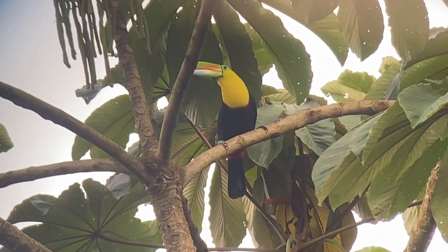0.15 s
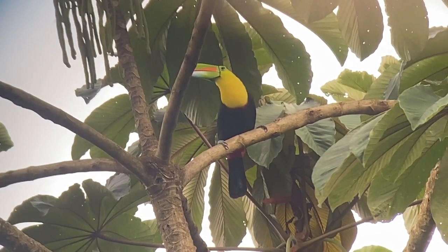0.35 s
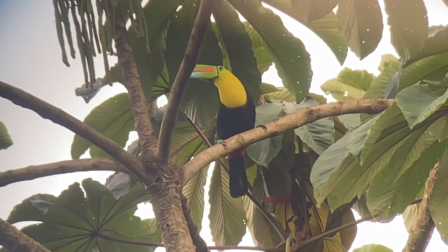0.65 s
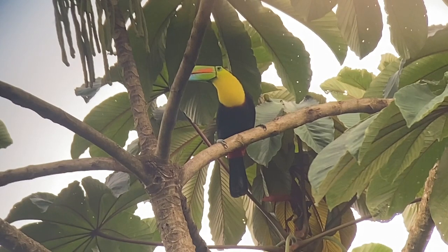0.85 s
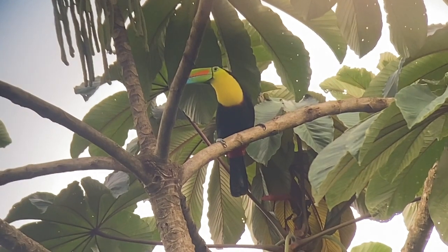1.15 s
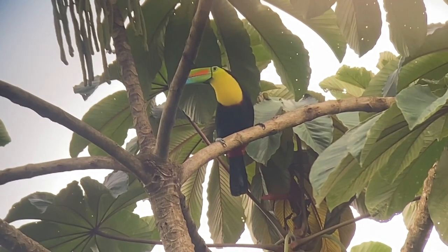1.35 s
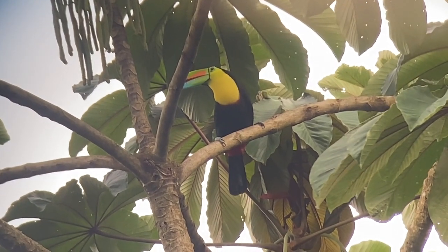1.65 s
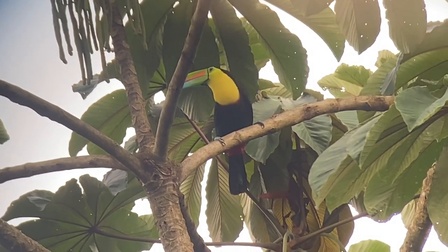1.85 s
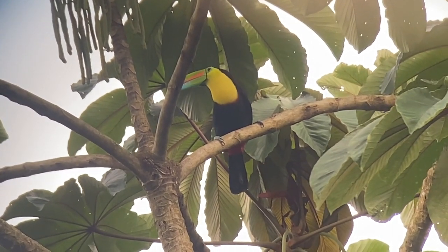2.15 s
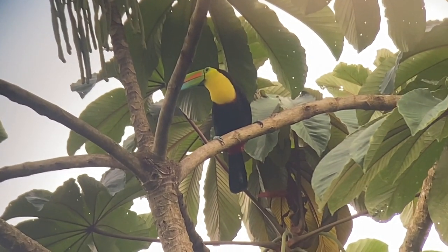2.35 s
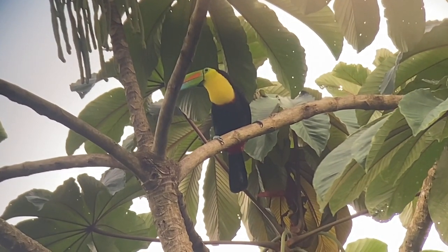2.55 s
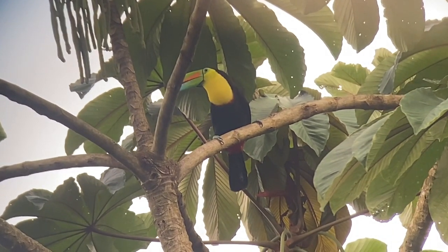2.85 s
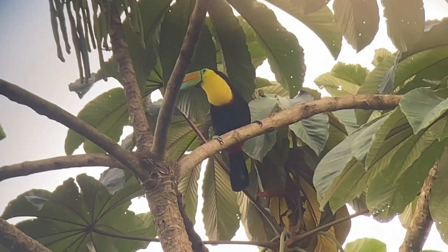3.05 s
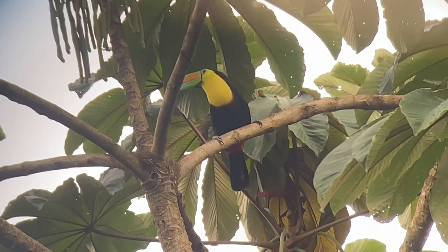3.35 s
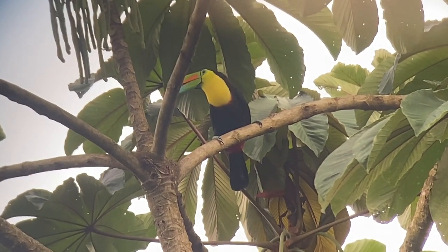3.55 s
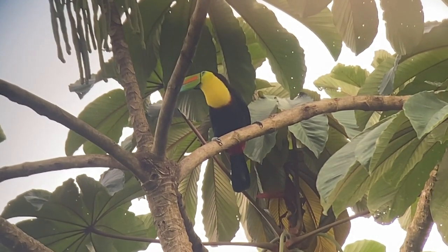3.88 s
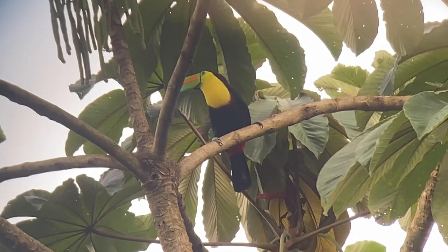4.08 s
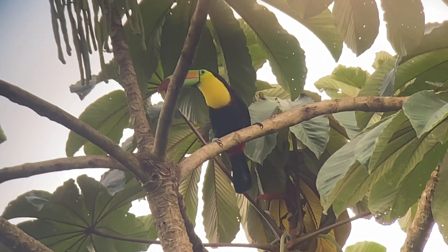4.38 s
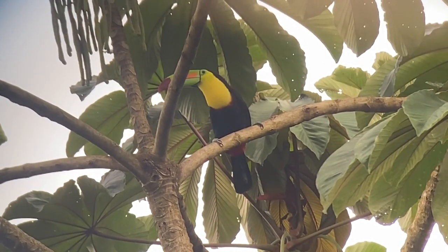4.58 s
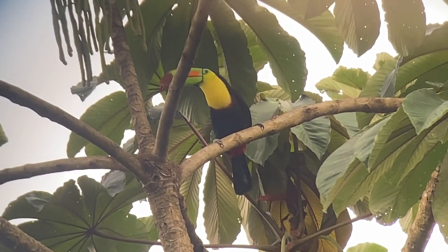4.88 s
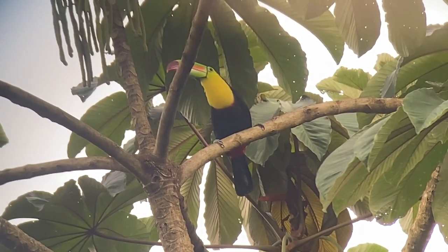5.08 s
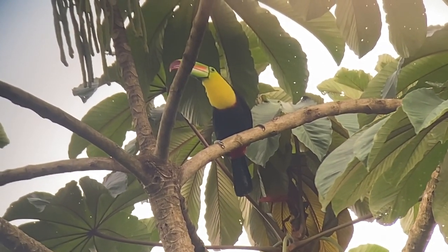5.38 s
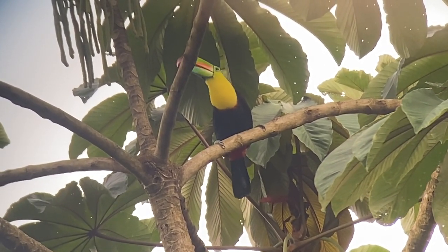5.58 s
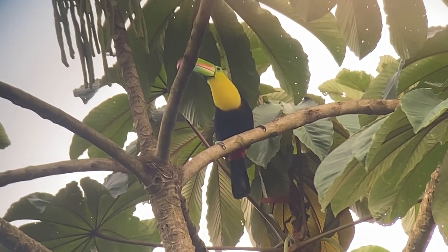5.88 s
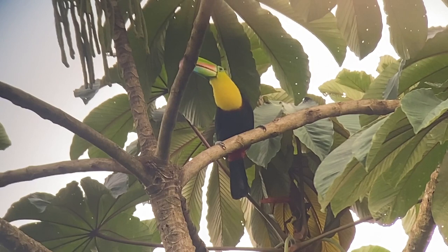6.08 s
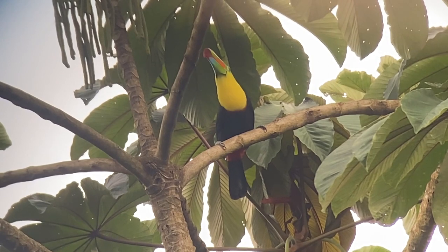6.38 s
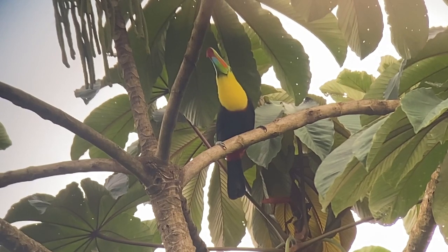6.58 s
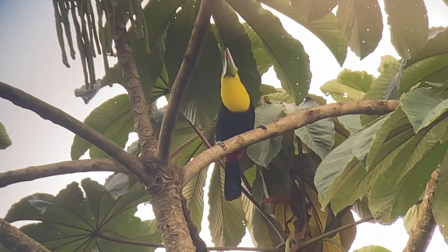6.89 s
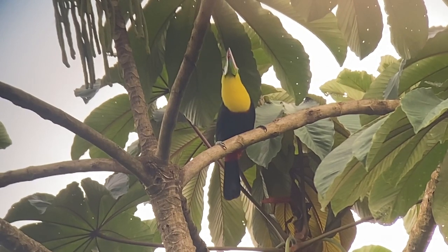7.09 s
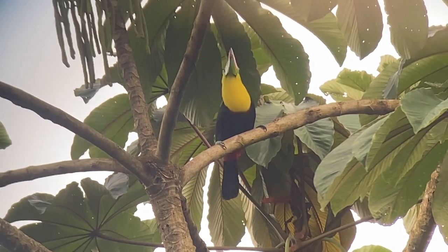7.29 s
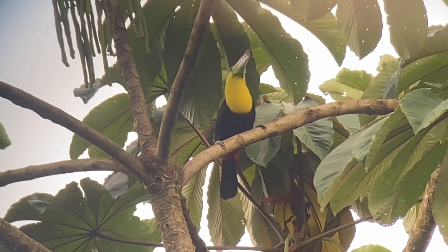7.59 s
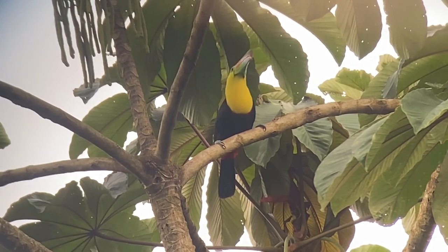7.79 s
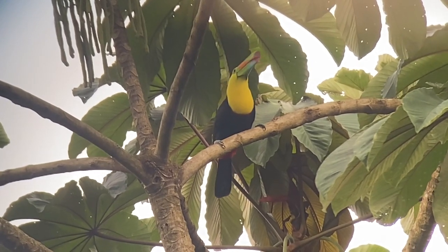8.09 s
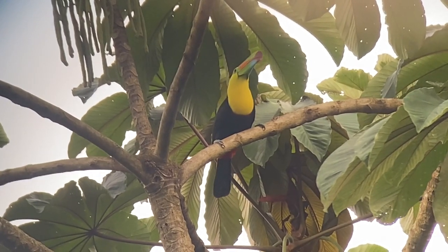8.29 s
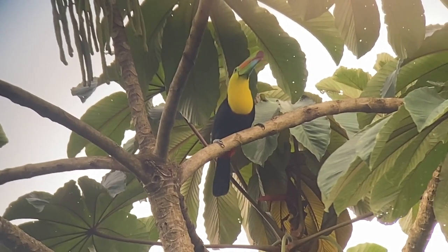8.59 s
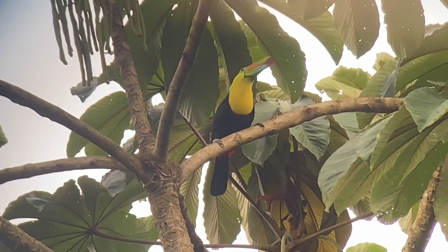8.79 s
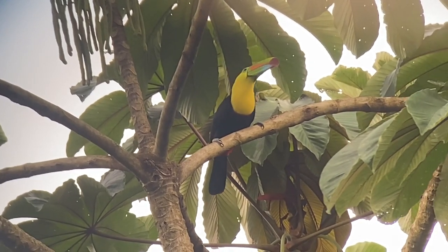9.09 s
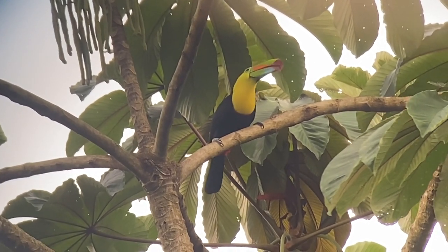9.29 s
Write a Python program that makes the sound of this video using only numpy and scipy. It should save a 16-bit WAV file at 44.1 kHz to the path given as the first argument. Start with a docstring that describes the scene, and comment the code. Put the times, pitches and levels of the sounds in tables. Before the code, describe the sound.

Two toucans trade short, dry croaks through the trees while insects hiss and light wind bumps the microphone.

```python
"""Two toucans in the forest

A toucan croaks in a tree a dozen metres away and a second answers from deeper in the forest. Each croak
is a rattle of short syrinx pulses that speeds up and rises, echoed by the leaves. Insect choirs hiss and
throb, a small caller chirps up high, and light wind thumps on the microphone. A low rustle, a wisp of
hiss and one thin bird whistle pass by."""
import sys
import numpy as np
from scipy import signal
from scipy.fft import rfft, irfft, next_fast_len
from scipy.io import wavfile
from scipy.ndimage import uniform_filter1d

SR = 44100
rng = np.random.default_rng(int(sys.argv[2]) if len(sys.argv) > 2 else 0)


def pcm_store(signal):
    """Save signal as 16-bit PCM."""
    levels = np.round(np.clip(np.atleast_2d(signal), -1, 1) * 32767)
    wavfile.write(sys.argv[1], SR, levels.astype(np.int16).T)


N = 416304

# Tone of the forest bed, centre and sides. Each row: frequency in Hz, relative level in dB.
BED_MID_SPECTRUM = [(100, -10), (160, -7.5), (350, -9.5), (1100, -16.5), (1700, -9), (2450, 3.5),
                    (3200, -13.5), (3700, -19.5), (5100, -26), (6050, -18), (6800, -17), (7500, -32),
                    (8400, -40), (12000, -60.5)]
BED_SIDE_SPECTRUM = [(24, -42.5), (60, -16), (180, -24.5), (560, -20), (1250, -18), (2000, -26),
                     (3200, -17), (7600, -50.5), (8500, -23), (9100, -27), (9650, -40), (10100, -68.5),
                     (14000, -100)]
# The ride of the wind rumble. Each row: time in seconds, level in dB.
RUMBLE_LEVELS = [(0.0, -73), (0.52, -68), (1.02, -57.5), (1.52, -61), (1.79, -53), (2.5, -52),
                 (2.92, -57.5), (4.05, -61), (4.6, -54), (4.81, -57), (6.1, -58.5), (6.73, -47.5),
                 (6.94, -54.5), (7.57, -52.5), (8.15, -58), (8.7, -54.5), (8.99, -49.5), (9.44, -60)]
# Eddies hitting the microphone. Each row: time in seconds, peak in dB, pitch in Hz, length in ms.
WIND_THUMPS = [(1.982, -37.5, 67.6, 19), (2.438, -32.5, 93, 32), (2.484, -29, 80.5, 33),
               (2.47, -38, 150, 50), (2.557, -39.5, 82, 10), (4.489, -49, 237, 33), (4.488, -37, 145, 14),
               (5.085, -40, 64, 26), (5.346, -45.5, 183, 43.5), (6.303, -31, 76, 10.5),
               (6.357, -36.5, 53.7, 31), (6.552, -27.5, 83, 7.8), (6.621, -27.5, 80, 20),
               (6.769, -29.5, 66, 9.5), (6.839, -29, 62, 41), (7.219, -39.5, 61.6, 88),
               (7.284, -48, 260, 15), (7.711, -25, 60, 23), (8.42, -47.5, 198, 15), (8.614, -37, 71.6, 41),
               (8.932, -47, 189, 21), (9.216, -38.5, 64.7, 18)]
# The small caller. Each row: time in seconds, relative level in dB, pitch in Hz.
HIGH_CHIRPS = [(.012, -66, 9000), (.32, -65, 9100), (.65, -66, 9000), (.99, -69, 8850), (1.31, -66, 9000),
               (1.625, -61, 9100), (1.96, -62, 9030), (2.29, -64, 8970), (2.63, -62, 8920),
               (3.201, -66, 9180), (3.54, -61, 8950), (3.87, -66, 8970), (4.21, -69, 9000),
               (4.54, -66, 9000), (4.905, -62, 8930), (5.24, -64, 8950), (5.58, -65, 8850),
               (5.91, -60, 9030), (6.72, -64, 9150), (7.23, -61, 9300), (7.57, -59, 8950),
               (7.89, -62, 9000), (8.23, -61, 9000), (8.58, -59, 9000), (8.93, -63, 9000),
               (9.31, -65, 9100)]
# The near toucan. Each row: times in seconds of the first pulse, the restart after a stumble, the switch
# to double speed, the peak and the last pulse; relative opening and peak levels in dB; slow-rattle pitch
# in Hz; base offsets in dB of the 2nd harmonic, the 3rd harmonic and every other fast pulse.
NEAR_CROAKS = [(.3221, .3221, .342, 0.38, .4065, -39, -33.5, 1800, -22, -18.5, -1),
               (.962, .962, 1.0443, 1.044, 1.0765, -39, -35, 1780, -17.5, -22, -6),
               (1.6233, 1.6628, 1.7471, 1.7, 1.7471, -39, -34, 1770, -16, -20, -2),
               (2.2898, 2.3187, 2.38, 2.37, 2.4137, -40, -35, 1800, -17.5, -23, -2.5),
               (2.9488, 2.9488, 3.0093, 3.02, 3.0747, -41.5, -35, 1770, -19, -24, 2),
               (3.6035, 3.6725, 3.6921, 3.695, 3.7255, -42, -33.5, 1800, -19, -27, -4),
               (4.2354, 4.2856, 4.3472, 4.34, 4.3677, -42, -33.5, 1789, -16.5, -24, -4),
               (4.9396, 4.9396, 5.0393, 5.03, 5.068, -39.5, -35.5, 1840, -16, -19, -3),
               (5.5653, 5.5943, 5.653, 5.66, 5.688, -42, -34, 1810, -18.5, -14.5, -2.5),
               (6.1938, 6.1938, 6.2743, 6.288, 6.3076, -41.5, -33.5, 1740, -19, -13, -6),
               (6.7958, 6.7958, 6.8754, 6.896, 6.93, -38.5, -31.5, 1770, -21, -17, -0.5),
               (7.4255, 7.4255, 7.485, 7.5052, 7.5375, -41, -32, 1780, -26, -16.5, -2),
               (8.038, 8.038, 8.138, 8.14, 8.1715, -39.5, -32, 1750, -24, -15.5, -3.5),
               (8.7234, 8.7623, 8.8243, 8.81, 8.856, -41.5, -31, 1730, -24.5, -14, -4),
               (9.3515, 9.3515, 9.4331, 9.435, 9.4331, -40, -31, 1730, -25.5, -16, -1)]
# Its head turn. Each row: time in seconds, how far it faces the microphone from 0 to 1.
HEAD_TURN = [(0, 0.42), (5.2, 0.6), (6.9, 0.82), (7.4, 0.9), (8.0, 0.87), (9.44, 0.84)]
# Beak resonances holding the 2nd and 3rd harmonics. Each row: pitch at rest in Hz, pitch wide open in Hz,
# delay in seconds, upward slide as a share of the pitch per second.
BEAK_RESONANCES = [(3820, 4080, .0012, 15), (6030, 6150, .0014, 15)]
# Slaps off the nearest leaves and boughs. Each row: delay in ms, relative level in dB, left bias in dB.
BOUGH_ECHOES = [(4.6, -10, 4), (9, -16, -4), (12.5, -20, 4)]
# The far toucan. Each row: times in seconds of the first pulse, the switch to double speed, the peak and
# the last pulse; relative opening and peak levels in dB; pitch at the peak in Hz.
FAR_CROAKS = [(.442, 0.468, .5102, .5195, -51, -40.5, 1623), (1.098, 1.1767, 1.159, 1.1767, -54, -39, 1620),
              (1.773, 1.813, 1.8136, 1.8234, -43.5, -40, 1638),
              (2.4456, 2.497, 2.506, 2.5155, -47.5, -40.5, 1605),
              (3.153, 3.215, 3.216, 3.216, -50, -35.5, 1623), (3.84, 3.9003, 3.912, 3.9255, -49, -42, 1780),
              (4.604, 4.646, 4.656, 4.667, -48, -37.5, 1630),
              (5.2974, 5.36, 5.3593, 5.3593, -47, -34.5, 1630),
              (5.954, 6.057, 6.02, 6.0576, -51.5, -39.5, 1626),
              (6.6978, 6.756, 6.7588, 6.768, -49, -40, 1640)]
# Dry ticks, most on a far croak's peak. Each row: time in seconds, relative peak in dB, pitch in Hz.
DRY_TICKS = [(0.521, -38, 2680), (1.175, -29, 2580), (1.8204, -39, 2340), (2.5126, -32, 2430),
             (3.22, -29.5, 2500), (3.917, -33, 2420), (4.67, -37, 2280), (5.364, -32, 2530),
             (6.053, -31, 2464), (6.766, -31, 2424)]
# One soft rustle: peak time, rise and fall in seconds, centre and width in Hz, level in dB.
LOW_RUSTLE = (4.48, .05, .08, 370, 400, -56)
# One wisp of hiss: peak time and fade each way in seconds, centre and width in Hz, level in dB.
HIGH_HISS = (6.13, .04, 9200, 3200, -77)
# A small bird's whistle. Each row: time in seconds, pitch in Hz, level in dB.
WHISTLE_PATH = [(8.768, 7200, -80), (8.776, 7050, -66), (8.788, 7000, -66), (8.8, 7450, -66),
                (8.812, 8000, -67), (8.818, 8200, -88)]

SLOW_GAP_S, FAST_GAP_S, THROAT_LAG_S = .0203, .0108, .001  # pulse timing of both toucans
SCATTER_S, SCATTER_DB, SCATTER_HZ = .0004, 1, 40  # looseness from pulse to pulse
SIDE = np.array([[1], [-1]])  # opposite polarity left and right


def undb(db):
    """Decibels to gain."""
    return 10 ** (np.asarray(db) / 20)


def level(x, db):
    """Set the RMS level."""
    return x * undb(db) / np.sqrt(np.mean(x ** 2))


def filtered(x, hz, kind, order):
    """Butterworth filter."""
    return signal.sosfilt(signal.butter(order, hz, kind, fs=SR, output="sos"), x)


def noise_band(hz, width, db, order=2):
    """Noise around a centre, at a set level."""
    return level(filtered(rng.standard_normal(N), [hz - width / 2, hz + width / 2], "band", order), db)


def walk(rate):
    """Smooth wander through rate random values a second; spread near 1."""
    hold = int(SR / rate)
    steps = np.repeat(rng.standard_normal(N // hold + 1), hold)
    return 1.65 * uniform_filter1d(uniform_filter1d(steps, hold), hold)[:N]


def rasp(hz, depth):
    """Grit: a gain that flutters around 2, up to hz times a second."""
    return 2 + depth * level(filtered(rng.standard_normal(N), hz, "low", 4), 0)


def swell(t, rise, fall):
    """Bell that peaks at t = 0, with its own rise and fall widths."""
    return np.exp(-.5 * (t / np.where(t < 0, rise, fall)) ** 2)


def tone(t, hz, phase=0, slide=0):
    """Sine that glides up by slide times its pitch per second."""
    return np.sin(2 * np.pi * hz * (t + slide / 2 * t ** 2) + phase)


def add(track, s, sound):
    """Mix a sound in at s seconds."""
    i = int(s * SR)
    first, last = max(i, 0), min(i + len(sound), len(track))
    track[first:last] += sound[first - i:last - i]


def shimmer(points, db, drift_db, flicker_db):
    """Shaped noise in third-octave bands that drift together and flicker alone."""
    size = next_fast_len(N)
    hz = np.maximum(np.arange(size // 2 + 1) * SR / size, 1)
    knots, gains = np.transpose(points)
    spectrum = rfft(rng.standard_normal(size)) * undb(np.interp(np.log(hz), np.log(knots), gains))
    band_index = np.clip(3 * np.log2(hz / 40), 0, 25)
    out, drift = np.zeros(N), walk(.7)
    for k in range(26):
        band = irfft(spectrum * np.clip(1 - abs(band_index - k), 0, 1), size)[:N]
        out += band * undb(drift_db * drift + flicker_db * walk(12))
    return level(out, db)


def forest_bed():
    """A wide wash of forest air and hissing insect choirs."""
    mid = shimmer(BED_MID_SPECTRUM, db=-49, drift_db=.3, flicker_db=.7)
    side = shimmer(BED_SIDE_SPECTRUM, db=-56, drift_db=.5, flicker_db=1)
    side += .29 * filtered(mid, [370, 1170], "band", 2)  # the low forest noise leans left
    return mid + side * SIDE


def katydids():
    """Three high insects, each throbbing ten or eleven times a second."""
    t, out = np.arange(N) / SR, np.zeros(N)
    for rate, hz in ((10.4, 6900), (11.3, 6820), (9.7, 6700)):
        throb = .6 + np.maximum(tone(t, rate, phase=1.5 * walk(1.5)), 0)
        out += throb * noise_band(hz, 260, db=0)
    return level(out, -66.5)


def wind():
    """Eddies on the microphone: low rumble and short thumps, a little different on each side."""
    gust = undb(np.interp(np.arange(N) / SR, *np.transpose(RUMBLE_LEVELS)) + 1.8 * walk(13))
    rumble = noise_band(74, 60, db=0) + noise_band(117, 77, db=-7)
    spread = noise_band(97, 110, db=-14)
    out = gust * (rumble + noise_band(49, 30, db=-7))
    t, push = np.arange(-5000, 5000) / SR, np.zeros(N)
    for s, db, hz, ms in WIND_THUMPS:
        shape = undb(db) * swell(t, .28 * ms / 1000, .5 * ms / 1000)
        add(out, s + t[0], shape * tone(t, hz, rng.uniform(0, 2 * np.pi)))
        add(push, s + t[0], shape)
    out += push * noise_band(130, 150, db=-25.5)
    return out + (gust + .27 * push) * spread * SIDE


def foliage(x, t60, db, centred):
    """Reverb of countless leaves: a decaying noise tail, mono when centred is 1."""
    t = np.arange(int(.7 * SR)) / SR
    envelope = np.exp(-np.log(1000) * t / t60) * (1 - np.exp(-t / .02))
    mid, side = rng.standard_normal((2, len(t))) * envelope
    tails = np.sqrt(centred) * mid + np.sqrt(1 - centred) * side * SIDE
    tails *= undb(db) / np.sqrt(np.sum(mid ** 2))
    return signal.fftconvolve(x[None], tails, axes=1)[:, :N]


def chirper():
    """Thin, trembling chirps that slide up and linger, in opposite polarity left and right."""
    out, t = np.zeros(N), np.arange(int(.25 * SR)) / SR
    for s, db, hz in HIGH_CHIRPS:
        pitch = hz * (1.005 - .025 * np.exp(-t / .025))
        shape = swell(t - .02, .008, .022) + .6 * swell(t - .09, .015, .035)
        add(out, s - .008, undb(db) * shape * np.sin(2 * np.pi * np.cumsum(pitch) / SR))
    out *= undb(3) * rasp(150, depth=.8)
    return (out + foliage(out, t60=.7, db=-1, centred=1)) * np.array([[1], [-.92]])


def pulse_times(first, doubles, last):
    """Rhythm of the syrinx: a slow run, then about twice as fast."""
    slow = np.linspace(first, doubles, round((doubles - first) / SLOW_GAP_S) + 1)
    fast = np.linspace(doubles, last, round((last - doubles) / FAST_GAP_S) + 1)
    return np.concatenate([slow, fast[1:]])


def near_rattle(first, resume, doubles, peak, last, open_db, peak_db, open_hz,
                second_db, third_db, offbeat_db):
    """Pulses of one near croak: they swell to the peak, then fade while the pitch keeps climbing."""
    stumble_s, fade_db_per_s = .026, 152.5
    peak_hz, climb_hz_per_s, opening_lift_hz, offbeat_lift_hz = 1910, 3500, 80, 98
    lead_in = np.arange(first, resume - stumble_s, SLOW_GAP_S)
    s = np.concatenate([lead_in, pulse_times(resume, doubles, last)])
    effort = np.clip((s - first) / (peak - first), 0, 1)
    after = np.maximum(s - peak, 0)
    offbeat = (s > doubles) * ((np.arange(len(s)) - np.argmin(abs(s - doubles))) % 2)
    db = open_db + (peak_db - open_db) * effort ** .78 - fade_db_per_s * after + offbeat_db * offbeat
    hz = open_hz + (peak_hz - open_hz) * effort ** 2.8 + climb_hz_per_s * after
    hz += opening_lift_hz * (s == first) + offbeat_lift_hz * offbeat
    gape = np.clip((s - first) / (last - first), 0, 1)
    slow = (s > first) * (s < doubles)
    second = second_db + 4.5 * (s == s[0])  # a nasal first pulse
    third = third_db - 2.5 * (1 - effort ** 3) - 31 * after  # opens toward the peak, then closes
    pulses = np.transpose([s - THROAT_LAG_S, db, hz, gape, slow, second, third])
    scatter = [SCATTER_S, SCATTER_DB, SCATTER_HZ, .15, 0, 3.5, 3.5]
    return pulses + scatter * rng.standard_normal((24, 7))[:len(s)]


def near_toucan():
    """Each syrinx pulse is a few cycles sliding up; overtones bloom just after, held by the beak."""
    slide, free_second_hz, throat_hz = 30, 3390, 1565
    out, snap, puff = np.zeros((3, N))
    t = np.arange(-200, 400) / SR
    pulses = np.concatenate([near_rattle(*croak) for croak in NEAR_CROAKS])
    for s, db, hz, gape, slow, second_db, third_db in pulses:
        phases = rng.uniform(0, 2 * np.pi, 5)
        facing = np.interp(s, *np.transpose(HEAD_TURN))
        pulse = swell(t, .0016, .0015) * tone(t, hz, phases[0], slide)
        # heard down the open beak, slow pulses lose overtone level and the 2nd harmonic slips lower
        release = slow * facing ** 4
        overtone_db = [second_db - release, third_db - 13.5 * slow * facing ** 2]
        for k, (rest_hz, open_hz, delay, beak_slide) in enumerate(BEAK_RESONANCES):
            pitch = rest_hz + gape * (open_hz - rest_hz)
            if k == 0:
                pitch += release * (free_second_hz - pitch)
            bloom = undb(overtone_db[k]) * swell(t - delay, .0015, .0024)
            pulse += bloom * tone(t - delay, pitch, phases[k + 1], beak_slide)
        for harmonic, under_db in ((4, -26.5), (5, -34.5)):  # these ride on the 3rd
            bite = undb(overtone_db[1] + under_db) * swell(t, .001, .0015)
            pulse += bite * tone(t, harmonic * hz, phases[harmonic - 1], slide)
        add(out, s + t[0], undb(db) * pulse)
        add(snap, s + t[0], facing * undb(db) * swell(t, .0006, .0012))
        add(puff, s + t[0], undb(db) * swell(t, .0019, .0021))
    out += puff * noise_band(2146, 810, db=-12.5)  # hoarse, turbulent air
    out *= rasp(600, depth=.21)
    out += snap * noise_band(4800, 3200, db=-21)  # the membranes snap open with a woody click
    return filtered(out, throat_hz, "high", 10)


def in_tree(call):
    """A call with dull slaps off the nearest boughs and a tail brightened by glossy leaves."""
    heard = np.array([call, call])
    bounce = filtered(call, 3000, "low", 1) * rasp(200, depth=.5)
    for ms, db, pan_db in BOUGH_ECHOES:
        lag = int(ms * SR / 1000)
        heard[:, lag:] += bounce[:-lag] * undb(db + SIDE * pan_db / 2)
    sheen = undb(-7.5) * filtered(call, 4600, "high", 10)
    return heard + foliage(call + sheen, t60=.57, db=-4.5, centred=.85)


def far_rattle(first, doubles, peak, last, open_db, peak_db, peak_hz):
    """Pulses of one far croak: they swell and rise to the peak, then die away."""
    open_hz, fade_db_per_s = 1534, 119.5
    s = pulse_times(first, doubles, last)
    effort = np.clip((s - first) / (peak - first), 0, 1)
    db = open_db + (peak_db - open_db) * effort ** 1.56 - fade_db_per_s * np.maximum(s - peak, 0)
    hz = open_hz + (peak_hz - open_hz) * effort ** 1.4
    scatter = [2 * SCATTER_S, SCATTER_DB, SCATTER_HZ] * rng.standard_normal((24, 3))[:len(s)]
    return np.transpose([s - THROAT_LAG_S, db, hz]) + scatter


def far_toucan():
    """Lower, longer pulses with breathy edges, smeared on their way through the leaves."""
    throat_hz = 1436
    out, breath = np.zeros((2, N))
    t = np.arange(-700, 700) / SR
    for s, db, hz in np.concatenate([far_rattle(*croak) for croak in FAR_CROAKS]):
        pulse = sum(undb(harmonic_db) * tone(t, harmonic * hz, rng.uniform(0, 2 * np.pi))
                    for harmonic, harmonic_db in ((1, 0), (2, -21), (3, -35)))
        add(out, s + t[0], undb(db) * swell(t, .0049, .005) * pulse)
        add(breath, s + t[0], undb(db) * swell(t, .0053, .014))
    out = filtered(out * rasp(500, depth=1), throat_hz, "high", 10)
    echo = foliage(out, t60=.46, db=-11.5, centred=.6) * rasp(500, depth=.7)
    return out + echo + breath * noise_band(2320, 1210, db=-9.5, order=4)


def ticks():
    """Tiny dry pips that put an edge on the far croaks."""
    out, t = np.zeros(N), np.arange(-700, 700) / SR
    for s, db, hz in DRY_TICKS:
        add(out, s + .00099 + t[0], undb(db) * swell(t, .001, .00099) * tone(t, hz))
    return out


def rustle():
    """A soft, grainy low rustle with a tail, like a hand shifting its grip."""
    s, rise, fall, hz, width, db = LOW_RUSTLE
    return swell(np.arange(N) / SR - s, rise, fall) * undb(2 * walk(72)) * noise_band(hz, width, db)


def hiss():
    """A brief wisp of high noise."""
    s, fade, hz, width, db = HIGH_HISS
    return swell(np.arange(N) / SR - s, fade, fade) * noise_band(hz, width, db)


def bird_whistle():
    """A small bird flicks one pure tone upward."""
    t = np.arange(N) / SR
    s, hz, db = np.transpose(WHISTLE_PATH)
    envelope = undb(np.interp(t, s, db, -140, -140))
    return envelope * np.sin(2 * np.pi * np.cumsum(np.interp(t, s, hz)) / SR)


def scene():
    """The stereo mix, with each toucan trimmed for its distance."""
    bed = forest_bed()
    near = undb(-1.05) * in_tree(near_toucan())
    far = undb(-1.5) * (far_toucan() + ticks())
    return bed + near + far + chirper() + hiss() + rustle() + bird_whistle() + katydids() + wind()


def record(dry):
    """The microphone: mono in the upper mids, a touch louder on the left, sub-bass and top cut away."""
    mid, side = (dry[0] + dry[1]) / 2, (dry[0] - dry[1]) / 2
    side = signal.sosfilt(signal.cheby2(4, 40, [3300, 7400], "bandstop", fs=SR, output="sos"), side)
    pair = (mid + side * SIDE) * undb(.3 * SIDE)
    top_cut = signal.ellip(8, .2, 70, 12300, fs=SR, output="sos")
    return signal.sosfilt(top_cut, filtered(pair, 35, "high", 2))


dry = scene()
out = record(dry)
pcm_store(out)
```